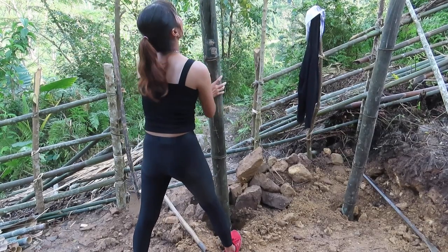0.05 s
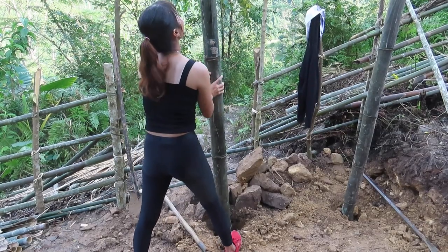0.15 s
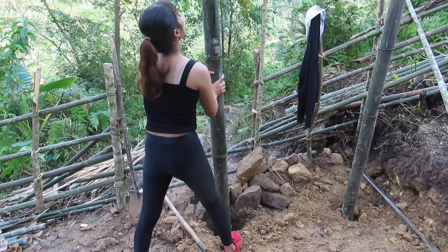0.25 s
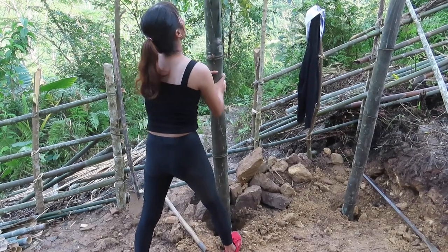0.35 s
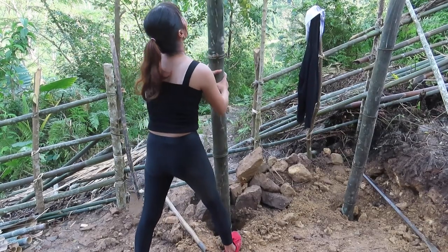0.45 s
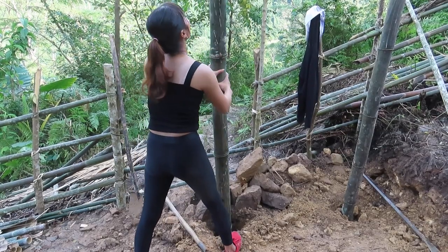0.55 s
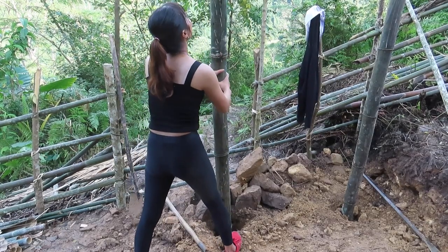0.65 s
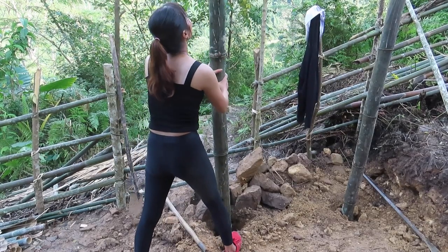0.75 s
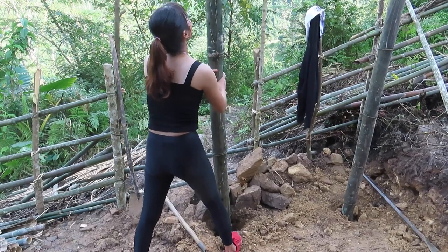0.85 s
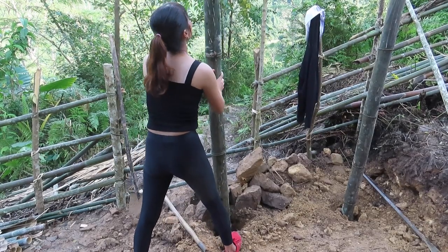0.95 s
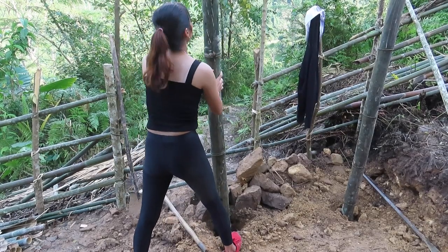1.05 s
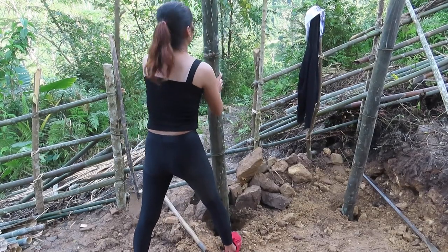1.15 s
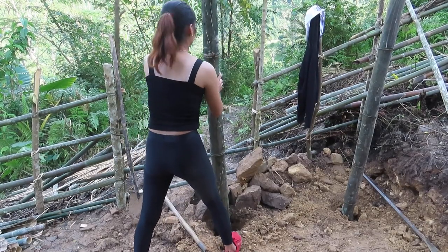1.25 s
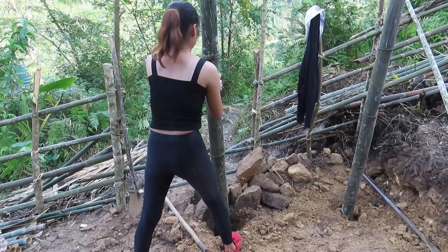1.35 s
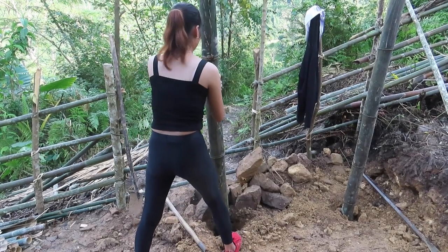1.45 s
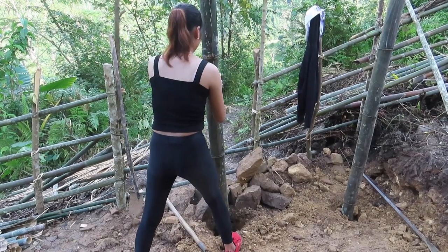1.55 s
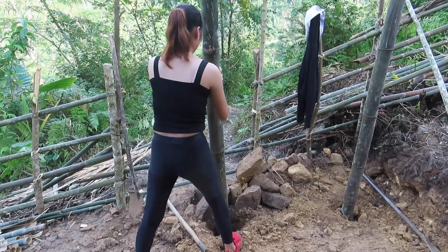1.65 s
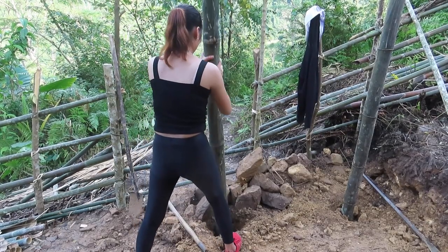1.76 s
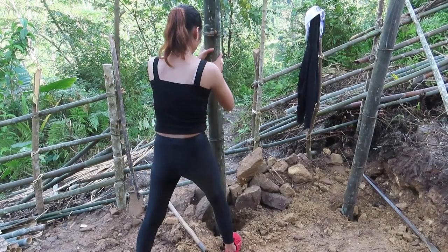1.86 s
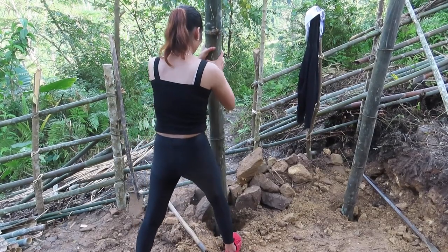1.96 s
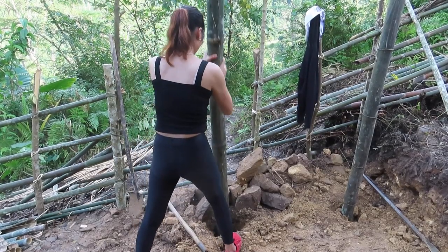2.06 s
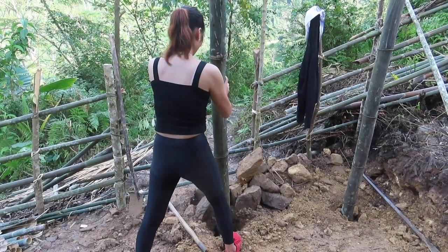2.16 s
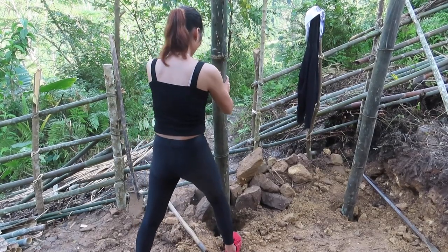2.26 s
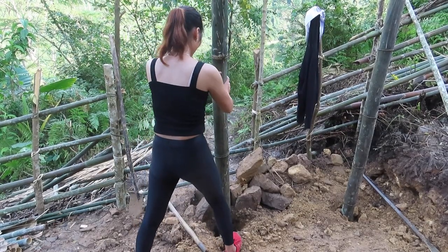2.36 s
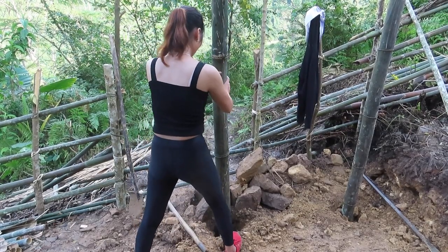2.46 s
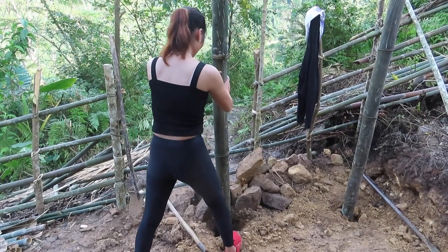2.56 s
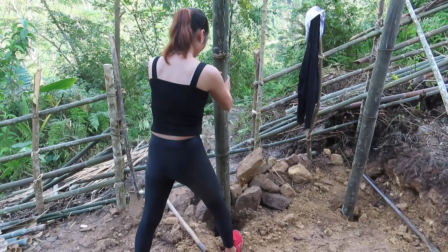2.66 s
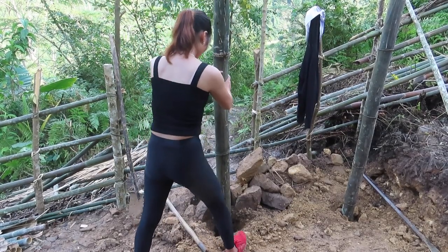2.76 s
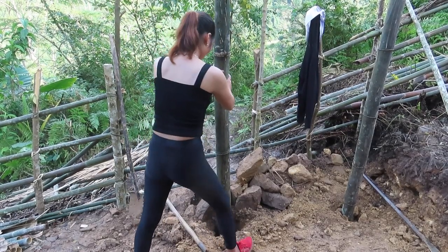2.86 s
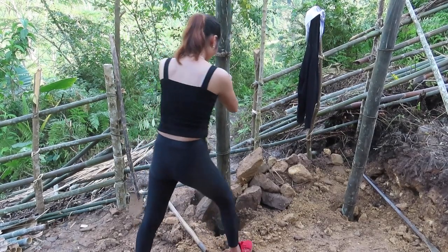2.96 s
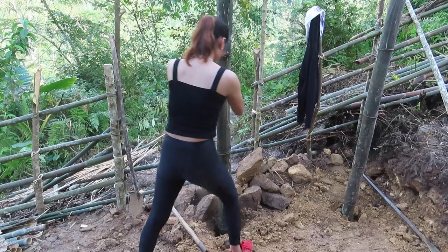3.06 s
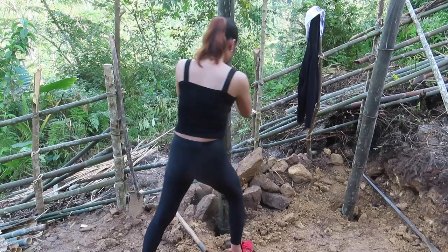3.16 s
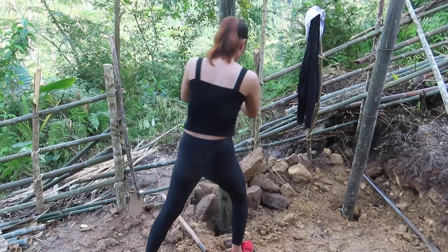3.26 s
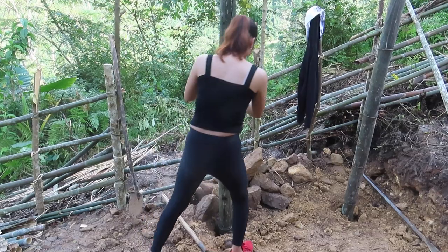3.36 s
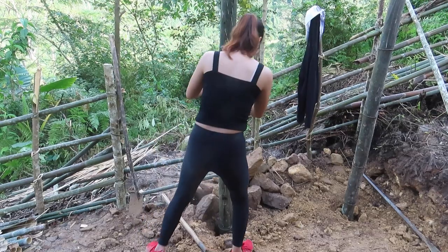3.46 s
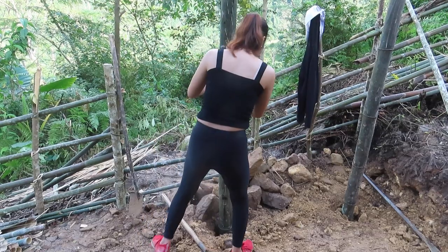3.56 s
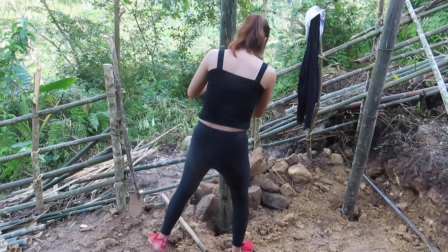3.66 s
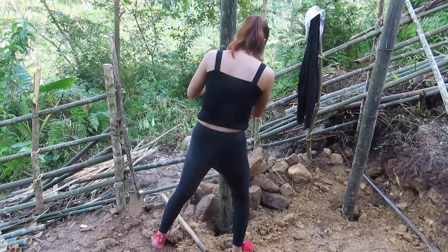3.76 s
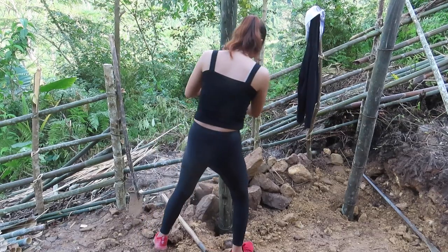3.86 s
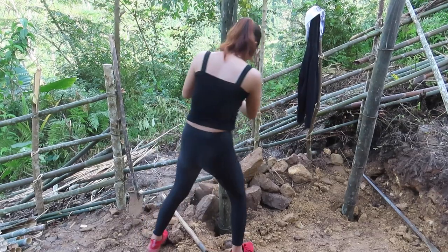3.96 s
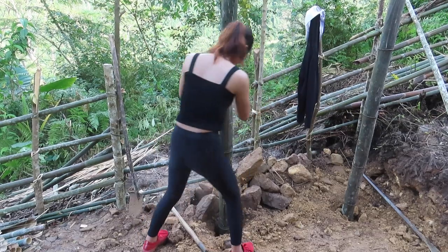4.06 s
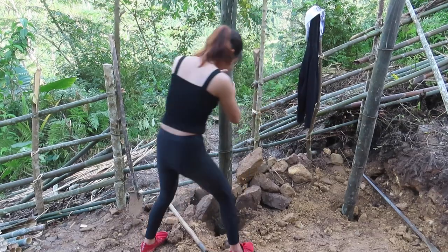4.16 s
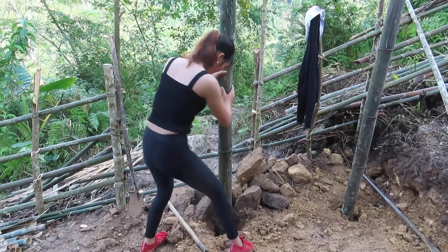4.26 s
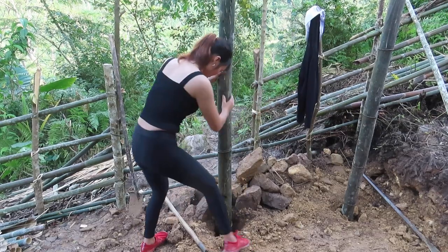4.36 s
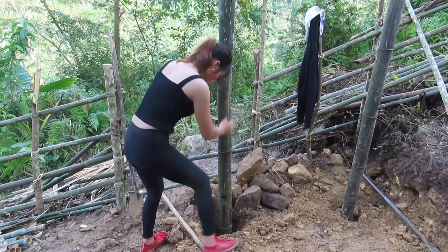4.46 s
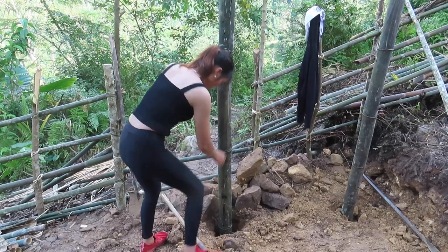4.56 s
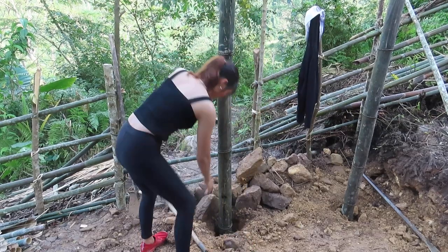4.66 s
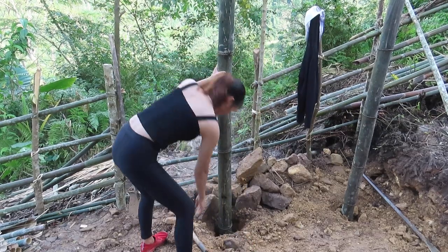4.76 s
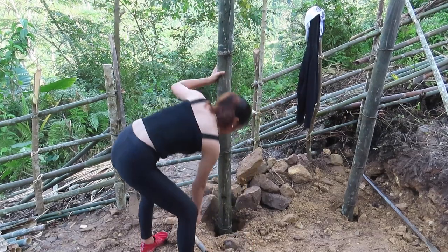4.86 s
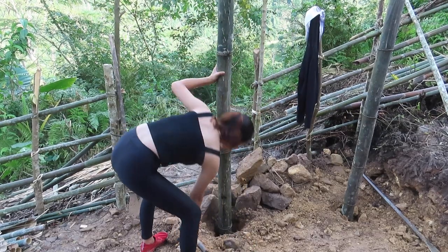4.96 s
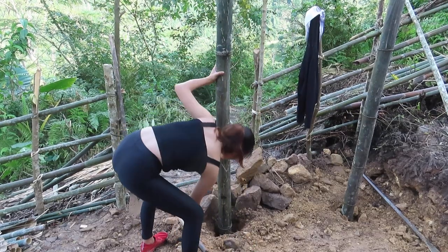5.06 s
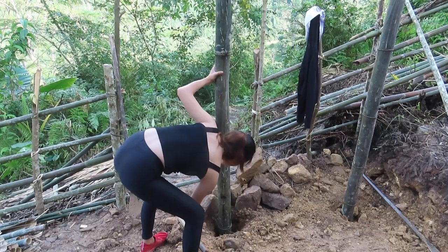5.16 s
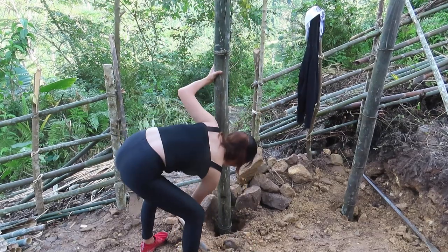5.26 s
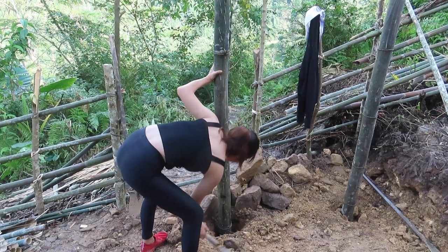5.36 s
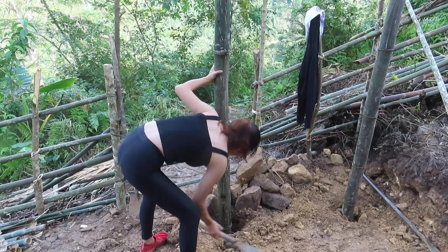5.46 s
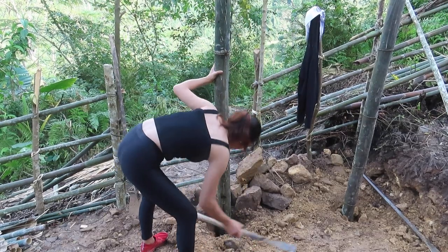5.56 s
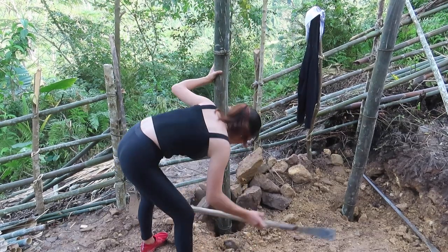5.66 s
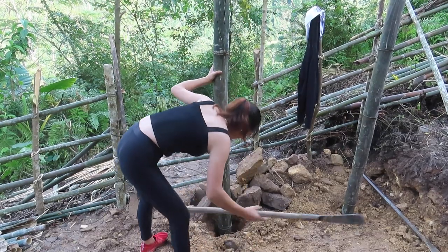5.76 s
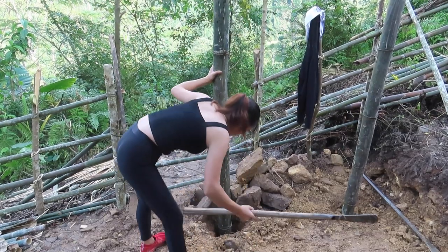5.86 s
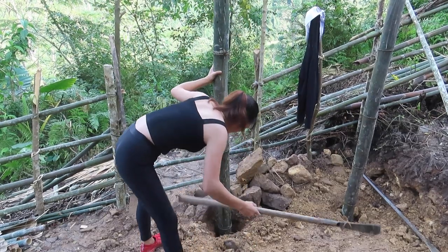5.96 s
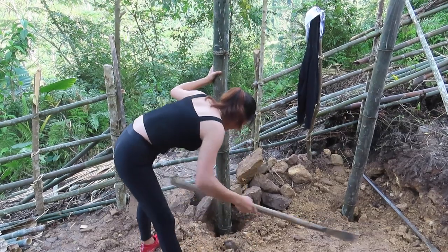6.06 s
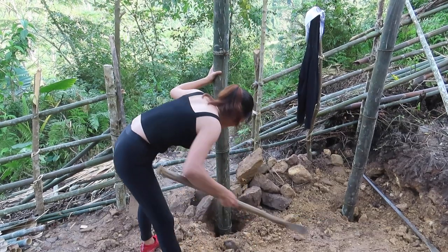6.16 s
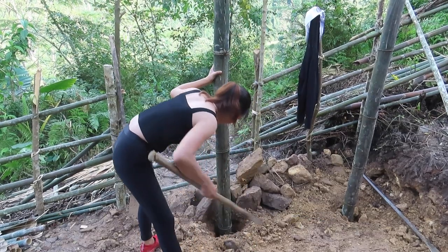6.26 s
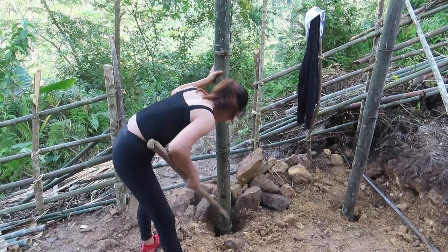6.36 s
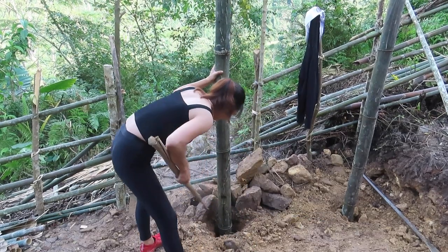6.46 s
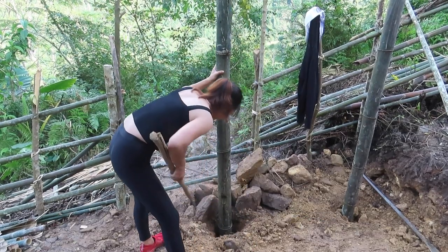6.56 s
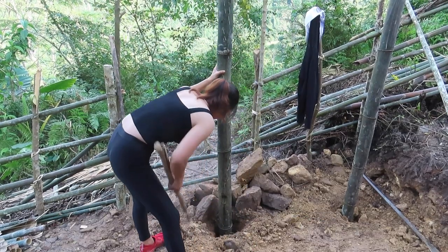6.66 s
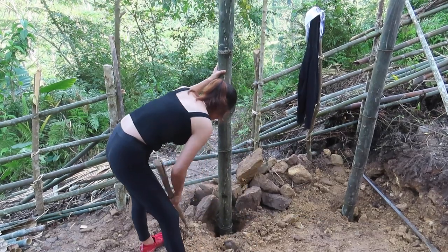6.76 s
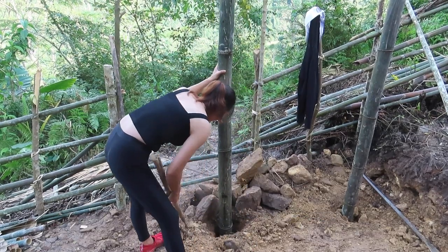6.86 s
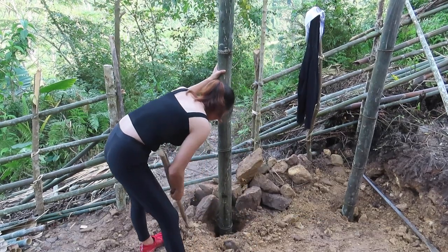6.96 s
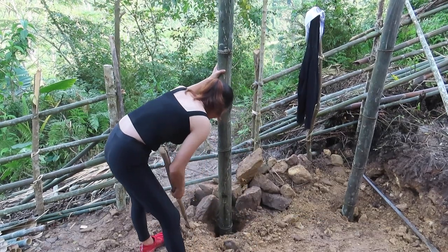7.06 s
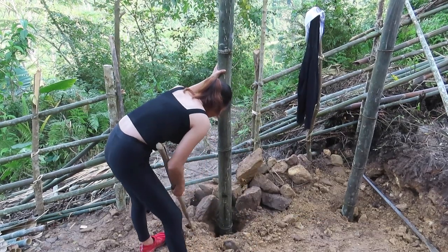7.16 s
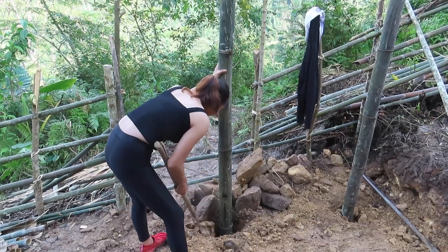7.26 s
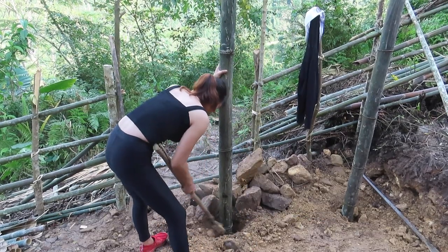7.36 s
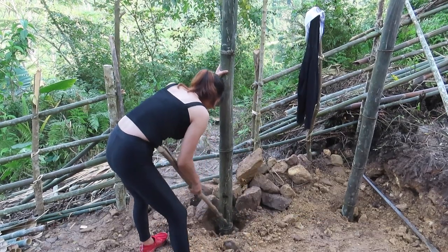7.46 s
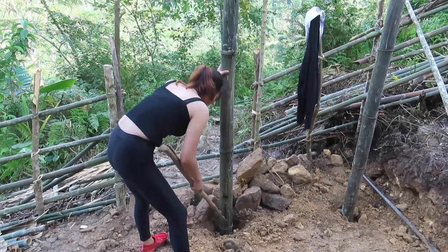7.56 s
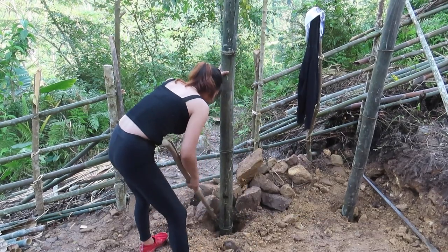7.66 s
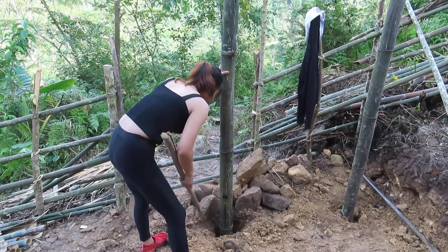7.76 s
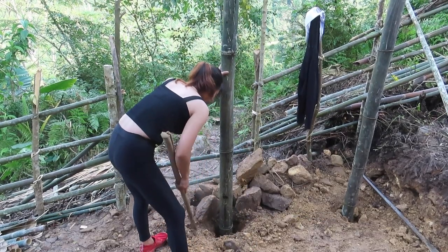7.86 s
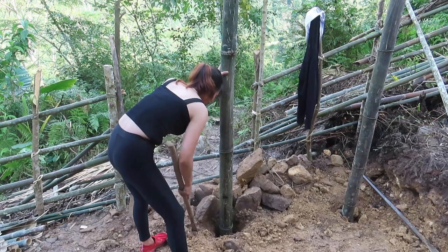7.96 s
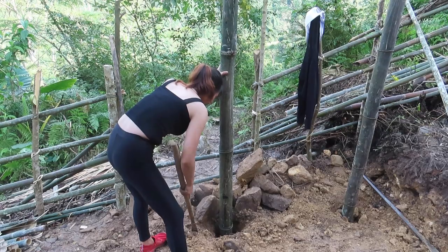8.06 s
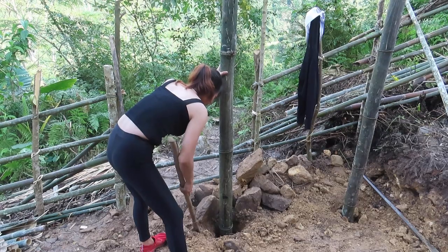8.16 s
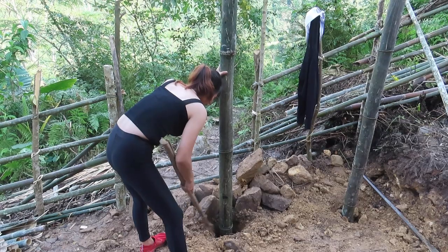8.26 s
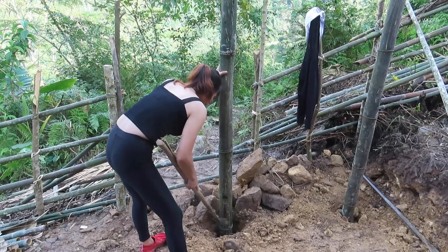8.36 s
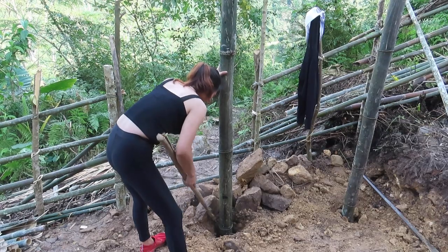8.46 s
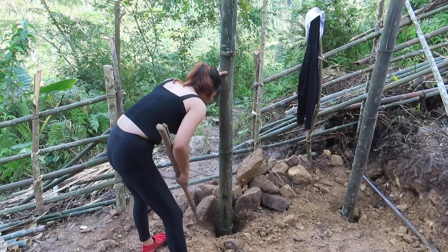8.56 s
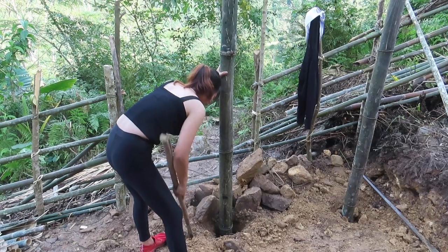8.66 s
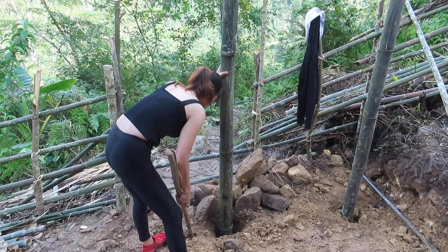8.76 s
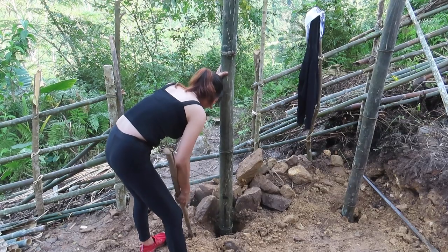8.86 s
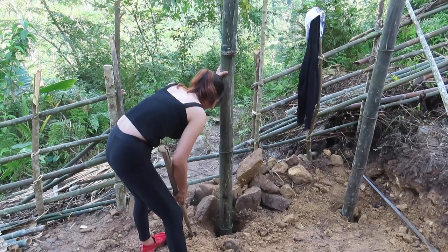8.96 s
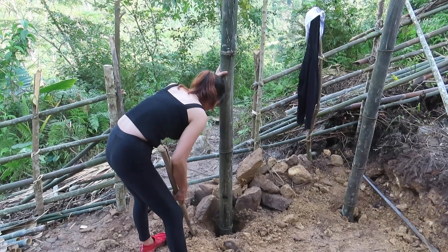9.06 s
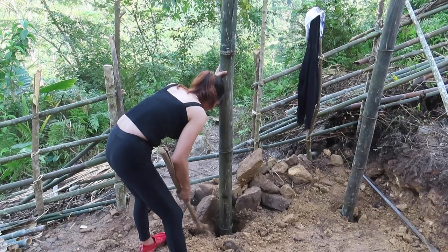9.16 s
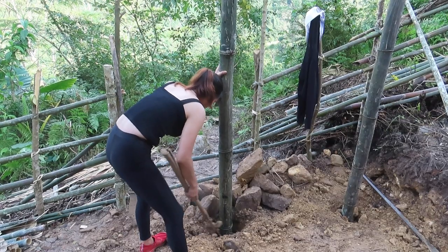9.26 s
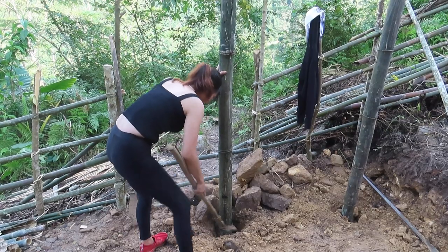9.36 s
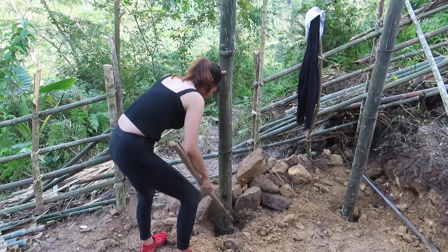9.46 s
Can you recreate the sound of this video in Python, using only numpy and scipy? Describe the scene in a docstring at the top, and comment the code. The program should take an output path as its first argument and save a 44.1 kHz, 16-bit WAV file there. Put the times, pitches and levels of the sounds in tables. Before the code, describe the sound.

Outdoors in a quiet forest clearing, close stereo microphones hear palms rub a bamboo post, then the post clatters down into its earth hole with a dull thud. After a pause with a bird trill, a wooden handle rams soil: a faint crunch, tumbling clods, then two stronger knocks. A near insect buzzes in fast, high pulsed trains over a low valley hush.

```python
"""Valley hush and far insects (shaped noise), then a near insect chirping in trains of short tones and gliding
bird whistles. Palms rub a bamboo post (swelling friction noise); a hand taps the post, which drops into its
hole in a forest clearing; the butt of a wooden hoe handle then rams soil and stones in around it. Post, handle
and tumbling clods are filtered modal impacts with crunch and spray; soil scuffs and litter ticks are bursts of
noise, and heavy thuds set off a decaying sine, the boom of the hole."""
import sys
import numpy as np
from scipy import signal
from scipy.fft import rfft, irfft
from scipy.io import wavfile
from scipy.ndimage import uniform_filter1d

SR = 44100
rng = np.random.default_rng(int(sys.argv[2]) if len(sys.argv) > 2 else 0)


def to_wav(s):
    """Save 16-bit WAV."""
    ch = np.atleast_2d(s).T  # columns
    pcm = np.round(np.clip(ch, -1, 1) * 32767)  # PCM
    wavfile.write(sys.argv[1], SR, pcm.astype(np.int16))


N = 419832
TIME_S = np.arange(N) / SR


def amp(db):
    """Decibels to amplitude factor."""
    return 10 ** (np.asarray(db) / 20)


def evened(x):
    """Scale to rms 1."""
    return x / np.sqrt(np.mean(x ** 2) + 1e-20)


def unit(x):
    """Scale to energy 1."""
    return x / (np.linalg.norm(x) + 1e-20)


def read(points, hz):
    """Interpolate a curve over log frequency."""
    point_hz, value = np.transpose(points)
    return np.interp(np.log(hz + 1), np.log(point_hz + 1), value)


def add(mix, start_s, sound):
    """Mix a sound in at its start time, cut at the end of the mix."""
    part = mix[max(round(start_s * SR), 0):][:len(sound)]
    part += sound[:len(part)]


def band(x, low_hz, high_hz):
    """Gentle high-pass, steeper low-pass."""
    x = signal.sosfilt(signal.butter(2, low_hz, "high", fs=SR, output="sos"), x)
    return signal.sosfilt(signal.butter(3, high_hz, fs=SR, output="sos"), x)


def bell(hz, centre_hz, width_hz):
    """Smooth hump around one frequency."""
    return np.exp(-.5 * ((hz - centre_hz) / width_hz) ** 2)


def grit(size, spread_db):
    """Noise made of 16-sample grains of very unequal size."""
    grain_db = spread_db * np.repeat(rng.standard_normal(size), repeats=16)[:size]
    return rng.standard_normal(size) * amp(grain_db)


# likeness of the left and right channels: (frequency [Hz], likeness [-1 to 1])
LIKENESS = [(60, 1), (130, 0.89), (290, 0.46), (640, 0.73), (1410, 0.59), (3100, 0.55), (6820, 0.45),
            (15000, -0.35)]


def air(gain):
    """Diffuse stereo noise of rms 1, less alike left to right in the treble; gain is a function of Hz."""
    hz = np.fft.rfftfreq(N, 1 / SR)
    common, apart = rfft(rng.standard_normal((2, N))) * gain(hz)
    same = np.clip(read(LIKENESS, hz), -1, 1)
    mid, side = common * np.sqrt(1 + same), apart * np.sqrt(1 - same)
    return evened(irfft([mid + side, mid - side], N))


# spectrum of the valley hush: (frequency [Hz], relative level [dB])
HUSH_SPECTRUM = [(20, -10), (45, -0.5), (90, 3), (150, 0.5), (300, -2), (480, -1.5), (850, -8),
                 (1300, -12.5), (2500, -18.5), (4000, -22), (6000, -24), (8500, -23.5), (10500, -33.5),
                 (15500, -37)]
# peaks and dips that colour the hush: (frequency [Hz], width [Hz], gain [dB])
HUSH_HOLLOWS = [(266, 14, 1), (380, 94, -2), (422, 5, 6), (673, 17, -3.5), (860, 26, 4), (1040, 26, 2)]


def hush(level_db=-44.5):
    """Slightly hollow hush of the valley: diffuse noise with spectral peaks and dips."""
    def gain(hz):
        hollow_db = sum(db * bell(hz, centre, width) for centre, width, db in HUSH_HOLLOWS)
        return amp(read(HUSH_SPECTRUM, hz) + hollow_db)
    return amp(level_db) * air(gain)


# far insects: (frequency [Hz], width [Hz], level [dB], share of the swell [0-1])
CHORUS_BANDS = [(6630, 330, -60, 0.02), (7060, 53, -68, 0.5), (7840, 150, -68.5, 0.7),
                (8340, 100, -68, 0.86), (8900, 160, -70, 0.06)]
# swell of the chorus: (time [s], gain [dB])
CHORUS_SWELL = [(0, -1), (1.2, -18), (2.8, -2), (3.6, 5), (6, 1.5), (8, 5.5), (9.5, -1)]


def chorus():
    """Far insects: narrow noise bands, each sharing a slow swell to its own degree."""
    out = np.zeros((2, N))
    swell_db = np.interp(TIME_S, *np.transpose(CHORUS_SWELL))
    for centre_hz, width_hz, db, share in CHORUS_BANDS:
        out += amp(db + share * swell_db) * air(lambda hz: bell(hz, centre_hz, width_hz))
    return out


def litter(ticks_per_s=90, level_db=-62):
    """Dry leaves and crumbs underfoot: random ticks of decaying, band-limited noise."""
    clicks = (rng.random(N) < ticks_per_s / SR) * rng.random(N) ** 2
    t = np.arange(SR // 20) / SR
    bursts = signal.fftconvolve(clicks, np.exp(-t / 0.0042))[:N]
    return amp(level_db) * evened(band(bursts * rng.standard_normal(N), 760, 3400))


STROKES_PER_S = 22.3
IDLE_DB, SPIN_UP_S = -9.5, 0.1  # weakest wind-up effort; ramp to full effort at the end of the wind-up
# near insect: (first stroke [s], last stroke [s], effort [dB], wind-up [s], falter of last stroke [dB])
WING_TRAINS = [(.034, .347, 0, 0, 0), (1.239, 2.721, 0, .08, -15), (2.765, 3.752, 0, 0, -7),
               (3.797, 5.315, 0, 0, 0), (7.47, 7.918, -6, .22, 0), (7.967, 9.494, 0, 0, 0)]


def wing_strokes():
    """Time and effort of every stroke: a train may wind up, holds steady and may falter as it stops."""
    for first_s, last_s, level_db, wind_up_s, falter_db in WING_TRAINS:
        times_s = np.linspace(first_s, last_s, round((last_s - first_s) * STROKES_PER_S) + 1)
        idle_share = np.clip((first_s + wind_up_s - times_s) / SPIN_UP_S, 0, 1)
        effort_db = level_db + IDLE_DB * idle_share
        effort_db[-1] += falter_db
        yield from zip(times_s, effort_db)


STROKE_S = .0055  # half length of a wing stroke


def insect(level_db=-31, base_hz=7080, arch_hz=125, sag_hz_per_db=19, octave_db=-37, rasp_db=-19):
    """Near insect: each wing stroke is a short tone arching in pitch; weaker strokes are lower."""
    t, out = np.arange(-SR // 45, SR // 45) / SR, np.zeros(N)
    rasp_band = signal.butter(2, [6450, 7150], "band", fs=SR, output="sos")
    for s, effort_db in wing_strokes():
        late, loud, sharp = rng.standard_normal(3)
        arch = arch_hz * np.exp(-((t - .001) / 0.0028) ** 2)
        hz = base_hz + sag_hz_per_db * effort_db + 12 * sharp + arch
        phase = 2 * np.pi * np.cumsum(hz) / SR
        tone = (np.sin(phase) + amp(octave_db) * np.sin(2 * phase)) * np.exp(-(t / STROKE_S) ** 2)
        # a faint noisy rasp closes each stroke
        rasp = evened(signal.sosfilt(rasp_band, rng.standard_normal(len(t))))
        stroke = tone + amp(rasp_db) * rasp * np.exp(-((t - .008) / 0.0035) ** 2)
        add(out, s + t[0] + 0.00043 * late, amp(level_db + effort_db + .5 * loud) * stroke)
    return out


TRILL_START_S, TRILL_STEP_S, TRILL_NOTE_S = 4.256, .101, .062
TRILL_DB, TRILL_HZ, TRILL_GLIDE = -48, 2186, -0.032


def trill(count=9, uneven_db=-1.0, stray_hz=10):
    """Evenly spaced whistle notes, each a little off in level and pitch."""
    notes = []
    for k, (loud, sharp) in enumerate(rng.standard_normal((count, 2))):
        start_s, db = TRILL_START_S + k * TRILL_STEP_S, TRILL_DB + uneven_db * loud
        notes.append((start_s, db, TRILL_HZ + stray_hz * sharp, TRILL_NOTE_S, TRILL_GLIDE))
    return notes


CHIP_S = 0.039
# chips of nearer birds: (time [s], level [dB], pitch [Hz], glide [share of pitch])
BIRD_CHIPS = [(.22, -50, 3550, -0.08), (4.47, -57, 3570, -0.023), (5.71, -49, 3140, 0.023),
              (6.121, -50, 1405, 0.11), (6.25, -55, 2900, -.18), (6.675, -51.5, 3650, -.25),
              (9.14, -49, 3190, .05)]


def birds(far_count=45, far_db=-59):
    """Soft whistles with a curved pitch glide: a trill, a few chips, and far birds at random."""
    out = np.zeros(N)
    chips = [(s, db, hz, CHIP_S, glide) for s, db, hz, glide in BIRD_CHIPS]
    # columns: time [s], level [dB], pitch [Hz], length [s], glide [share of pitch]
    lowest, highest = [0, far_db - 6, 2600, .025, -.25], [N / SR, far_db, 4300, .07, .05]
    far = rng.uniform(lowest, highest, (far_count, 5))
    for s, db, hz, length_s, glide in [*trill(), *chips, *far]:
        u = np.linspace(-.5, .5, round(length_s * SR))
        pitch_hz = hz * (1 + glide * u + 0.19 * u ** 2)
        whistle = np.sin(2 * np.pi * np.cumsum(pitch_hz) / SR)
        add(out, s, amp(db) * whistle * np.sqrt(np.abs(np.cos(np.pi * u))))
    return out


RUB_ATTACK_S, RUB_RELEASE_S = 0.062, 0.017
# palms on the post: (start [s], end [s], level at end [dB], swell [dB], spectrum shift by speed [factor])
PALM_RUBS = [(.25, 0.57, -34, 6, 0.91), (1.54, 1.711, -38.5, 13, 1.33)]
# spectrum of skin on bamboo: (frequency [Hz], relative level [dB])
RUB_SPECTRUM = [(150, -15), (450, -7), (700, -5), (1150, -4.5), (1650, -3.5), (2000, -10.5), (2450, -9.5),
                (3300, -18.5), (4150, -20), (5500, -23.5), (8000, -34), (14000, -45)]


def palms():
    """Friction noise of skin on bamboo; each stroke swells as the grip tightens, then stops short."""
    hz, out = np.fft.rfftfreq(N, 1 / SR), np.zeros(N)
    friction = rfft(rng.standard_normal(N))
    for start_s, end_s, db, swell_db, shift in PALM_RUBS:
        attack = np.clip((TIME_S - start_s) / RUB_ATTACK_S, 0, 1)
        hold = amp(np.interp(TIME_S, [start_s, end_s], [db - swell_db, db]))
        release = np.exp(-np.maximum(TIME_S - end_s, 0) / RUB_RELEASE_S)
        rub = evened(irfft(friction * amp(read(RUB_SPECTRUM, hz / shift)), N))
        out += rub * attack * hold * release
    return out


BASS_FOLLOW = 0.86  # harder blows have less bass: exponent of the lower edge on hardness
CRUNCH_REF_S = .01  # decay at which a crunch has its nominal level; longer ones carry more
SPRAY_LOW, SPRAY_HIGH, SPRAY_DECAY_S = 0.2, 2.05, 0.0037  # band edges as factors on hardness


def knocks(blows, modes, damping, bass_hz, crack_db, crunch_db, spray_db):
    """Each blow: a contact and dying crunch ringing the struck modes, plus a snap of crushed crumbs."""
    t, out = np.arange(SR // 3) / SR, np.zeros(N)
    ring = np.zeros(len(t))
    for k, (hz, width_hz, mode_db) in enumerate(modes):
        # the factor damping scales the mode widths: above 1 the grip of soil and hands widens them and shortens
        # the ring, below 1 they ring longer
        decay = np.exp(-np.pi * width_hz * damping * t)
        ring += (-1) ** k * amp(mode_db) * width_hz * decay * np.sin(2 * np.pi * hz * t)
    ring = unit(ring)
    ring[0] += amp(crack_db)  # the contact itself radiates at all frequencies
    settle = np.exp(-t / SPRAY_DECAY_S)
    for s, db, hard_hz, decay_s in blows:
        low_hz = bass_hz * (hard_hz / 1000) ** BASS_FOLLOW  # bass_hz: lower edge at 1 kHz hardness
        contact = unit(band(ring, low_hz, hard_hz))
        grains = grit(len(t), spread_db=7) * np.exp(-t / decay_s)
        crunch_level = amp(crunch_db) * np.sqrt(decay_s / CRUNCH_REF_S)
        crunch = crunch_level * unit(signal.fftconvolve(grains, contact)[:len(t)])
        crumbs = band(grit(len(t), spread_db=8.5), SPRAY_LOW * hard_hz, SPRAY_HIGH * hard_hz)
        spray = amp(spray_db) * unit(settle * crumbs)
        blow = unit(contact + crunch) + spray
        add(out, s, amp(db) * blow * np.sqrt(SR / 100))  # level as rms over 10 ms, before spray
    return out


# modes of the hole: (frequency [Hz], width before damping [Hz], relative level [dB])
HOLE_MODES = [(160.7, 7.7, 3.5), (275, 170, -12), (454, 20, 3), (549, 34, -2.5), (980, 105, -2.5),
              (970, 67, -5)]
# falling clods and soil: (time [s], level [dB], hardness [Hz], crunch decay [s])
SOIL_BLOWS = [(1.325, -41, 700, .01), (2.224, -23, 240, 0.0074), (6.77, -40, 1210, .025),
              (7.5058, -24.5, 2040, 0.0034), (7.515, -26.5, 594, 0.023), (7.53, -27.5, 159, 0.0087),
              (7.5465, -26, 202, .005), (7.637, -31.5, 705, 0.0057), (7.649, -27.5, 1190, 0.013),
              (7.658, -36, 720, 0.012), (7.811, -32.5, 1300, 0.026), (7.849, -34, 1900, 0.019),
              (7.89, -34.5, 700, .005)]


def clods():
    """Clods tumbling into the hole: impacts ringing its modes."""
    return knocks(SOIL_BLOWS, HOLE_MODES, damping=1.0, bass_hz=420,
                  crack_db=-1.5, crunch_db=-2.0, spray_db=-12.5)


SCUFF_RISE_SHARE = 0.41  # part of the length spent swelling
SCUFF_LOW, SCUFF_HIGH = 0.16, 1.88  # band edges as factors on pitch
# crumbly soil scuffed by feet and handle: (peak time [s], level [dB], length [s], pitch [Hz])
SOIL_SCUFFS = [(1.393, -46.5, .03, 2380), (1.649, -50, .05, 1800), (1.692, -33.5, .014, 2600),
               (2.201, -25.5, 0.033, 2420), (2.802, -49.5, .05, 2000), (4.39, -48, 0.061, 4570),
               (4.762, -39.5, 0.058, 1670), (5.847, -51.5, .1, 3400), (6.804, -35.5, 0.048, 2630),
               (7.42, -39.5, 0.022, 3020), (7.5, -27.5, 0.0069, 2830), (7.517, -30, 0.029, 1720),
               (7.588, -41, 0.021, 2700), (7.667, -43.5, 0.037, 3080), (7.788, -42.5, 0.017, 2980),
               (7.852, -40, 0.024, 2400), (7.961, -28, 0.012, 3570), (7.963, -25, 0.011, 328),
               (8.015, -36, 0.026, 1990), (8.136, -45, 0.028, 3100), (8.209, -33.5, 0.021, 1450),
               (8.254, -42.5, 0.025, 1460), (8.517, -42.5, 0.0083, 2200), (9.237, -42, 0.025, 2350),
               (9.445, -42, 0.055, 1240), (9.471, -33, 0.019, 2950), (9.508, -37.5, 0.014, 800)]


def scuffs():
    """Crumbs of soil grind in short noise swells that rise faster than they fall."""
    t, out = np.arange(-SR // 5, SR // 5) / SR, np.zeros(N)
    for s, db, length_s, hz in SOIL_SCUFFS:
        crumbs = evened(band(grit(len(t), spread_db=4.0), SCUFF_LOW * hz, SCUFF_HIGH * hz))
        distance_s = np.maximum(-t / SCUFF_RISE_SHARE, t / (1 - SCUFF_RISE_SHARE))
        add(out, s + t[0], amp(db) * crumbs * np.exp(-distance_s / length_s))
    return out


# modes of the bamboo post: (frequency [Hz], width before damping [Hz], relative level [dB])
POST_MODES = [(75, 69, 2), (139, 100, -5.5), (255, 32, -3), (403, 170, 0.5), (567, 96, -11), (823, 17, 6.5),
              (1052, 54, 12), (1210, 50, 0), (1377, 59, 10.5), (1440, 110, 2), (1615, 69, 9.5),
              (1790, 160, 3.5), (1870, 65, -25), (2150, 67, -25), (2320, 130, 4), (2470, 110, 6),
              (2800, 560, -3.5), (3680, 110, -30), (4140, 77, 7.5), (4300, 100, 5), (4340, 80, -13),
              (4840, 160, -23)]
# blows of the post: (time [s], level [dB], hardness [Hz], crunch decay [s])
POST_BLOWS = [(1.938, -37, 2700, 0.012), (2.1856, -16, 3950, 0.012), (2.1918, -17.5, 1640, 0.005),
              (2.1965, -17, 475, 0.0012), (2.2018, -12.5, 3840, 0.0023), (2.2105, -22.5, 1680, 0.015),
              (2.216, -24, 135, 0.011), (4.1915, -43, 2210, 0.0049)]


def post():
    """Bamboo post tapped by a hand and dropped into its hole: impacts ringing its modes."""
    return knocks(POST_BLOWS, POST_MODES, damping=0.79, bass_hz=265,
                  crack_db=-2.5, crunch_db=2.5, spray_db=-18)


BOOM_RISE_S, BOOM_DECAY_S = .012, 0.04
# heavy thuds that set the air in the hole booming: (time [s], peak level [dB])
HOLE_BOOMS = [(2.227, -36), (7.519, -34)]


def booms():
    """The lowest mode of the hole swells after a heavy thud and rings on."""
    t, out = np.arange(SR // 3) / SR, np.zeros(N)
    swell = (1 - np.exp(-t / BOOM_RISE_S)) * np.exp(-t / BOOM_DECAY_S)
    boom = np.sin(2 * np.pi * HOLE_MODES[0][0] * t) * swell
    for s, db in HOLE_BOOMS:
        add(out, s, amp(db) * boom / np.abs(boom).max())
    return out


# modes of the hoe handle: (frequency [Hz], width before damping [Hz], relative level [dB])
HANDLE_MODES = [(760, 37, 2), (884, 34, 8), (980, 26, -4), (1287, 15, 9.5), (1670, 124, 10),
                (1724, 117, 8.5), (1900, 83, 11), (1950, 144, 7), (2310, 22, 3), (2370, 80, -6),
                (2770, 100, 3.5), (2817, 73, 1), (3830, 130, -11.5), (3780, 18, 2.5), (4680, 490, -0.5),
                (4570, 53, 7), (5740, 130, -0.5)]
# blows of the handle: (time [s], level [dB], hardness [Hz], crunch decay [s])
HANDLE_BLOWS = [(4.7572, -37.5, 3800, 0.0038), (6.768, -30, 2180, 0.036), (7.427, -39, 2200, 0.0083),
                (7.7364, -40, 2500, 0.0061), (7.9548, -18.5, 2460, 0.00053), (7.9622, -22, 2200, 0.0055),
                (8.7279, -17, 2640, 0.003), (8.7415, -12, 3600, 0.004), (8.755, -20, 3670, 0.03),
                (9.388, -30.5, 1700, .006), (9.463, -28.5, 4800, 0.0022)]


def handle():
    """Butt of the wooden handle ramming soil and stones: impacts ringing its modes."""
    return knocks(HANDLE_BLOWS, HANDLE_MODES, damping=1.53, bass_hz=360,
                  crack_db=-5, crunch_db=2.5, spray_db=-17)


# reverberation of the clearing: (frequency [Hz], t60 [s])
CLEARING_T60 = [(150, 0.26), (1000, 0.052), (3000, 0.23), (7000, 0.15), (14000, 0.12)]


def clearing(x, wet_db, build_s=0.0028):
    """Direct sound plus scatter from ground, stacked poles and trees, different at each microphone."""
    hz, t, z = signal.stft(rng.standard_normal((3, SR // 2)), SR, nperseg=256)
    z = z * amp(-60 * t / read(CLEARING_T60, hz)[:, None]) * (1 - np.exp(-t / build_s))
    same = np.clip(read(LIKENESS, hz), 0, 1)[:, None]
    tail = signal.istft(np.sqrt(same) * z[0] + np.sqrt(1 - same) * z[1:], SR, nperseg=256)[1]
    tail = tail / np.linalg.norm(tail[0])
    return x + amp(wet_db) * signal.fftconvolve(x[None], tail, axes=1)[:, :N]


def ports(x, spread_db, from_hz):
    """The two microphones hear the treble of a near sound out of phase."""
    hz = np.fft.rfftfreq(N, 1 / SR)
    treble = hz ** 2 / (hz ** 2 + from_hz ** 2)
    side = irfft(1j * rfft(x.mean(0)) * amp(spread_db) * treble, N)
    return x + np.array([side, -side])


def waver(x, patchy_db):
    """The level drifts in small patches of time and frequency, least in the bass."""
    hz, _, z = signal.stft(x, SR, nperseg=2048)
    patches = uniform_filter1d(rng.standard_normal(z.shape[1:]), size=4, axis=0)
    patches = evened(uniform_filter1d(patches, size=4, axis=1))
    depth = read([(100, 0.1), (400, 0.76), (1200, 0.55), (4000, 0.74)], hz)[:, None]
    return signal.istft(z * amp(patchy_db * depth * patches), SR, nperseg=2048)[1][:, :N]


def scene():
    """The work at the hole, close by, within the insects, birds and hush of the clearing."""
    background = waver(hush() + chorus(), patchy_db=2.5)
    # the near insect and its echoes sit in the middle
    chirping = clearing(insect(), wet_db=-7.0).mean(0, keepdims=True)
    whistles = clearing(birds(), wet_db=-6.5, build_s=0.012)
    close = litter() + palms() + clods() + scuffs() + post() + booms() + handle()
    work = ports(clearing(close, wet_db=-14.5), spread_db=-4.0, from_hz=5700)
    return background + ports(chirping, spread_db=-7.5, from_hz=4600) + whistles + work


EDGE_HZ = 15750


def record(dry):
    """Full-scale limit, then band limit."""
    low_pass = signal.firwin(511, EDGE_HZ, window=("kaiser", 9), fs=SR)
    return signal.oaconvolve(np.clip(dry, -1, 1), low_pass[None], "same")


dry = scene()
out = record(dry)
to_wav(out)
```